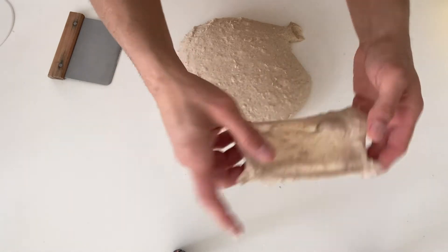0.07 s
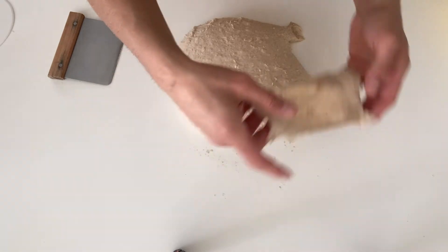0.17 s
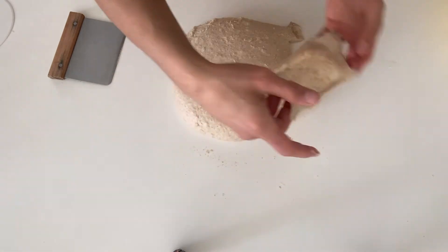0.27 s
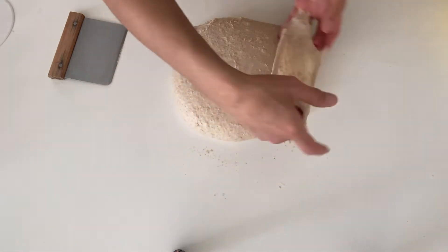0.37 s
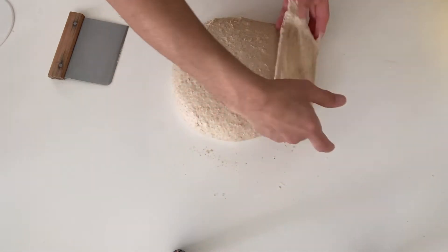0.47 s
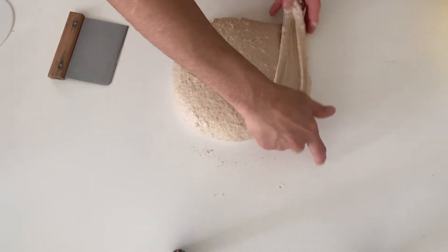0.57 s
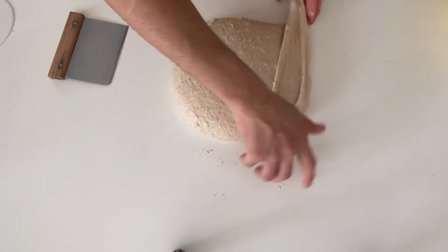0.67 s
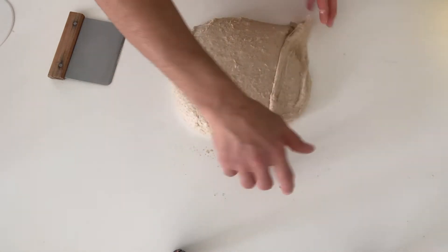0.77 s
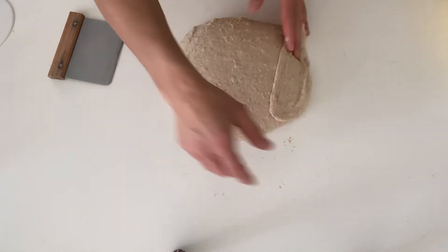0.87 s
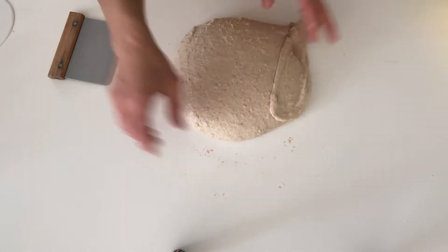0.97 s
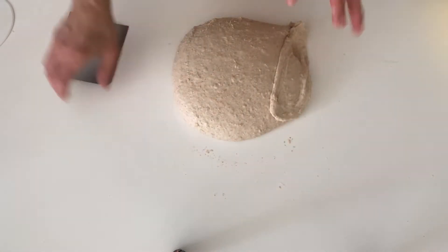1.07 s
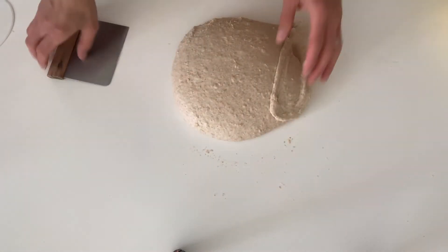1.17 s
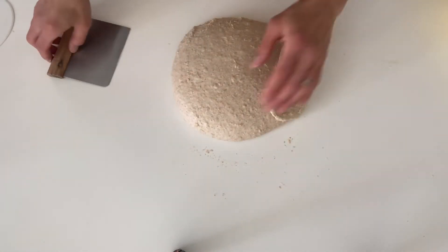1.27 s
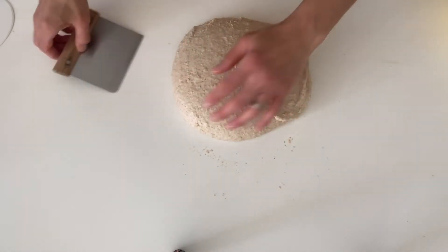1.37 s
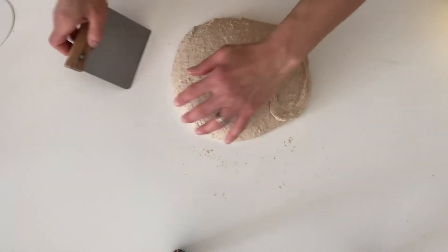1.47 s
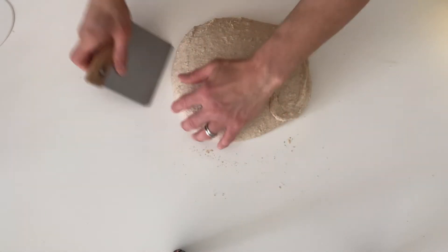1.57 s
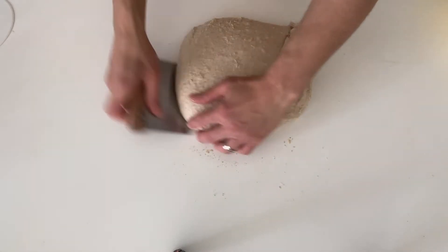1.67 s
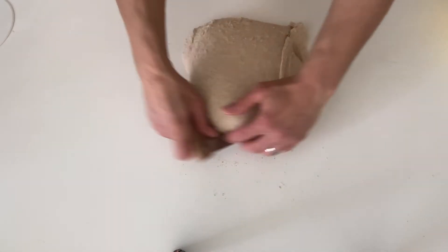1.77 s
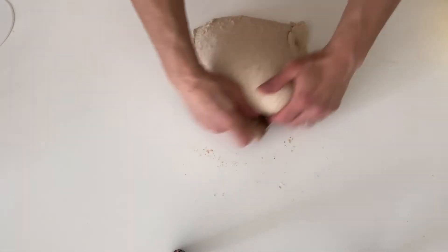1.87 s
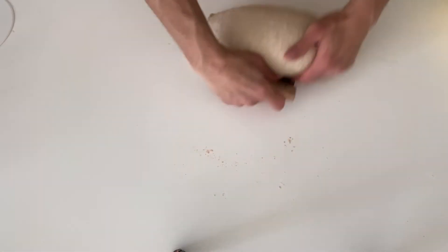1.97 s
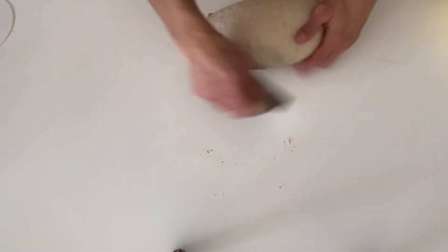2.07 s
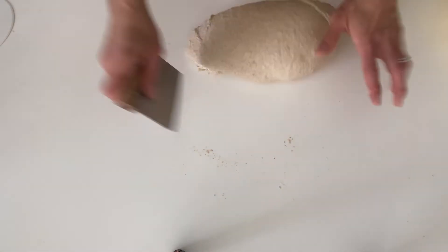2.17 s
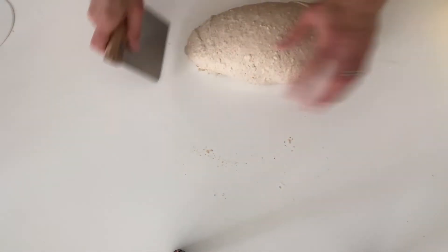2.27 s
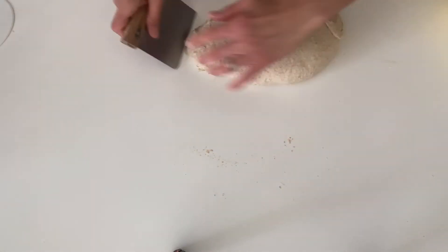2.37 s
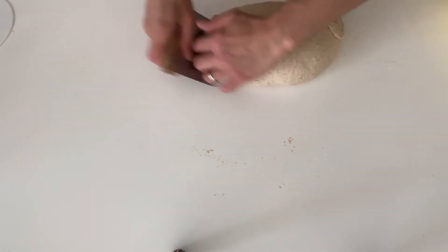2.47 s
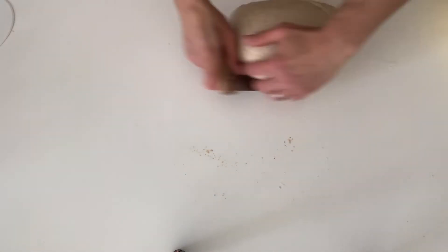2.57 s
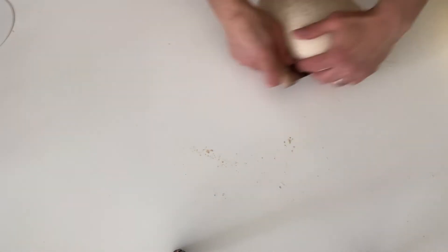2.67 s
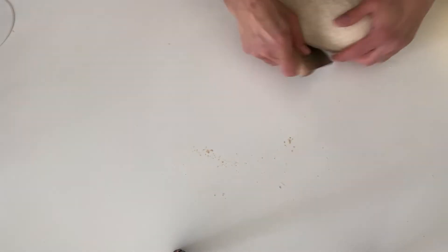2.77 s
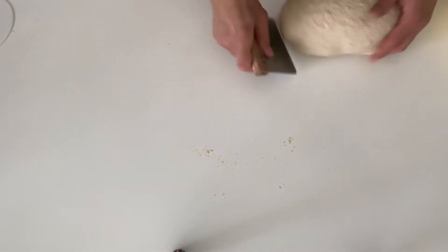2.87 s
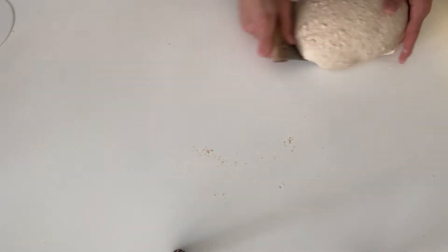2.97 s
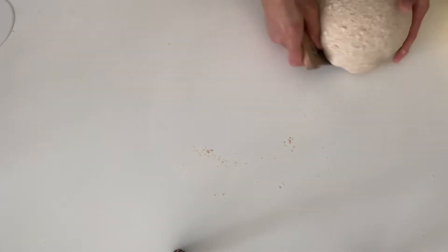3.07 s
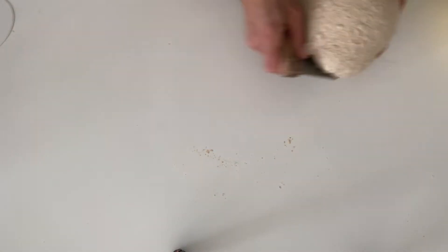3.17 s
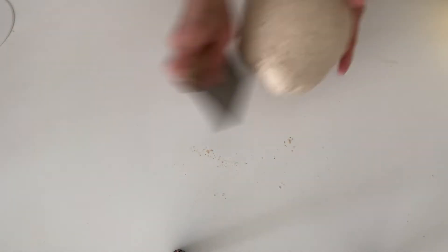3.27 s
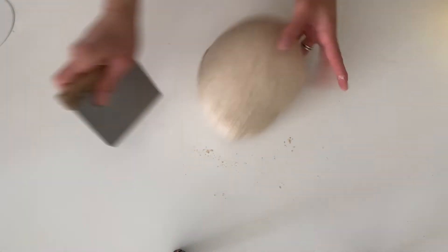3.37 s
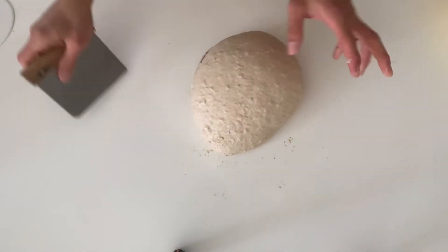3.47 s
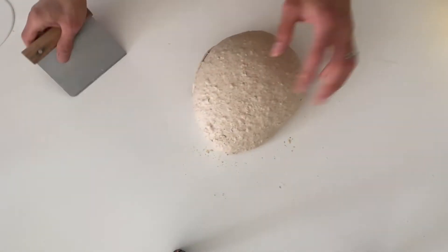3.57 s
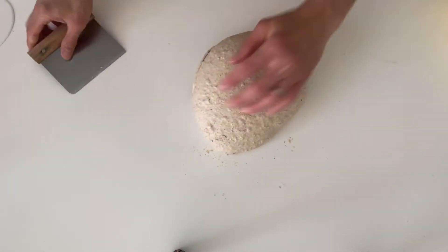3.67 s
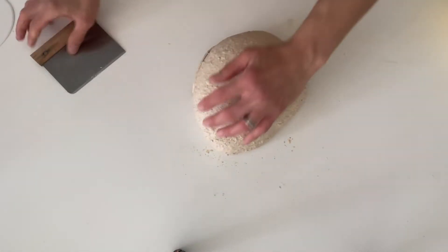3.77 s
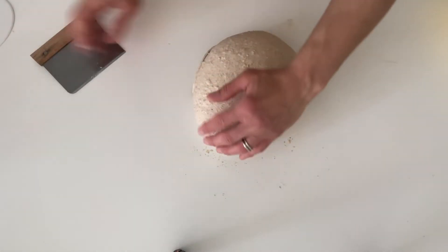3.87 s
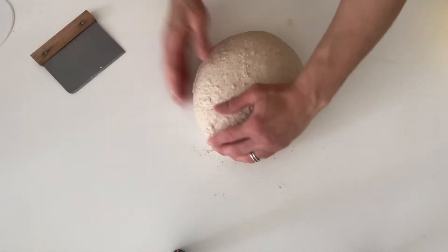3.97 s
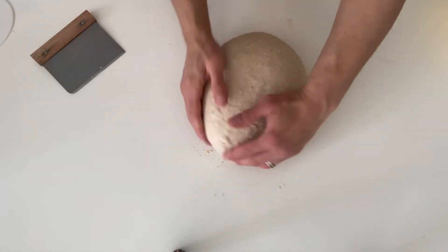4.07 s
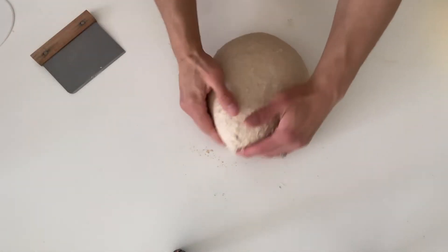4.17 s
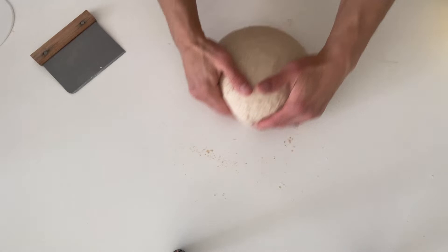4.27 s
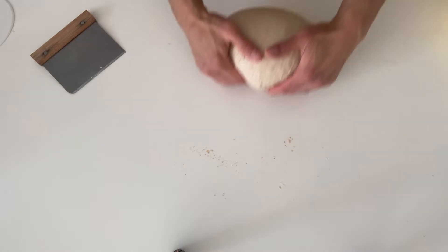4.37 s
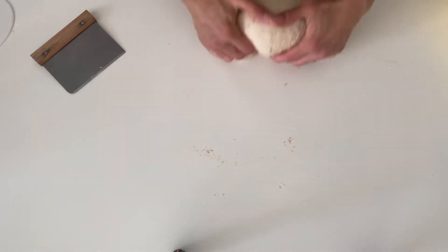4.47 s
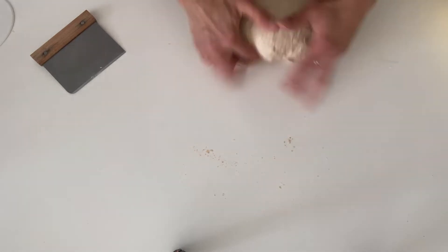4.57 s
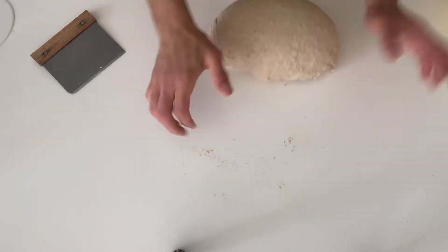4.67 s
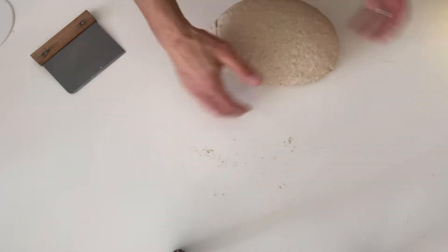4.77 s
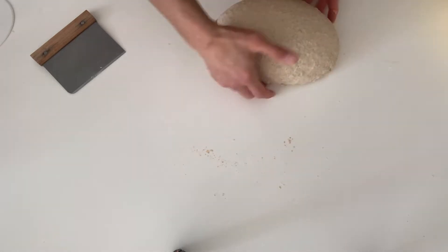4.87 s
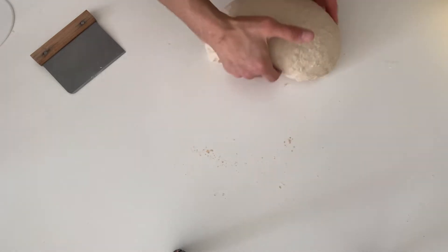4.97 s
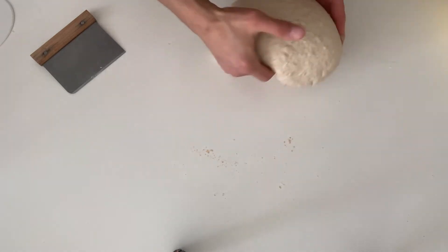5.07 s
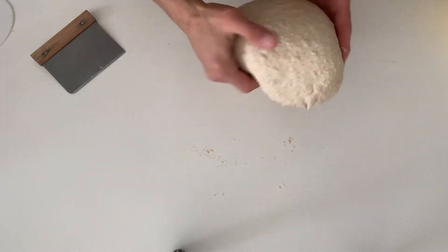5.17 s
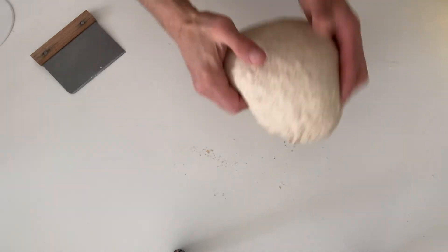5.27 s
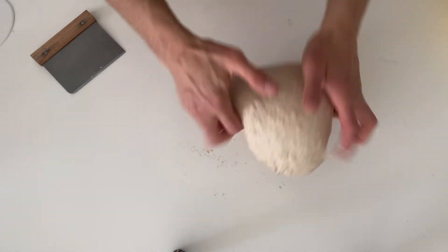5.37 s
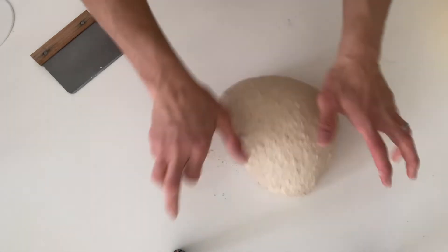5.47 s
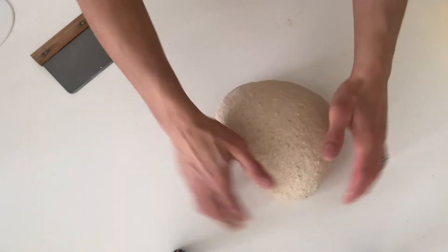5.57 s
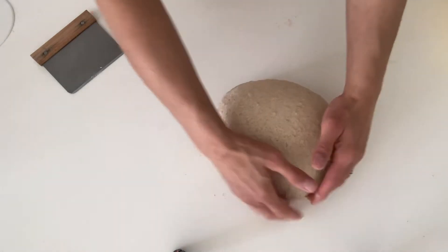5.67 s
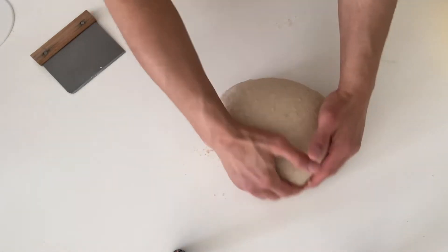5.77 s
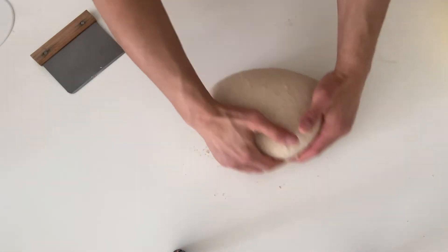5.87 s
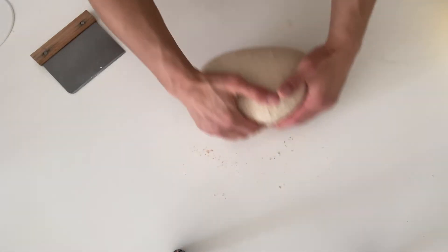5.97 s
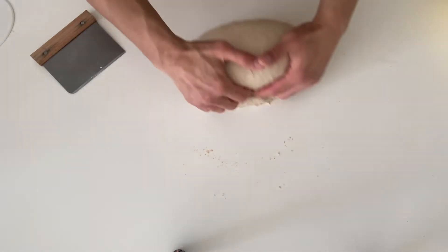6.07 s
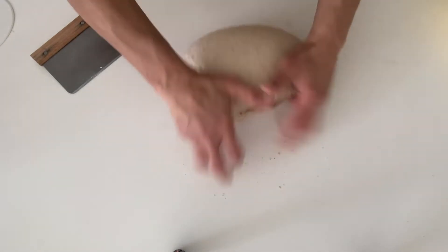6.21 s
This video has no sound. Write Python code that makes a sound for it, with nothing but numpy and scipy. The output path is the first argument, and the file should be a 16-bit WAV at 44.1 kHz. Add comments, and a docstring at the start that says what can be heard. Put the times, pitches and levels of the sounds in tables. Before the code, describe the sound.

Over a low appliance hum, hands faintly rub and pat dough. A steel bench scraper clinks and is dragged off the worktop, then pushed under the dough in three gritty strokes, each starting with a click. It is dropped with a loud, briefly ringing clatter of blade and wooden handle. Soft pats and brushing palms follow. One small microphone hears the worktop up close in a hard-walled kitchen.

```python
"""A low appliance hum and faint hands on dough, then a steel bench scraper clinks and drags off the worktop.
It is pushed under the dough in three gritty strokes, crushing flour, and dropped with a clatter of blade,
wooden handle and slab. Then palms pat and drag the dough softly.
A hard-walled kitchen, heard in mono on one small microphone; the worktop sounds close, the walls behind."""
import sys
import numpy as np
from scipy import signal
from scipy.fft import rfft, irfft, next_fast_len
from scipy.io import wavfile
from scipy.ndimage import map_coordinates

SR = 44100
rng = np.random.default_rng(int(sys.argv[2]) if len(sys.argv) > 2 else 0)


def pcm_store(signal):
    """Save signal as 16-bit PCM."""
    levels = np.round(np.clip(np.atleast_2d(signal), -1, 1) * 32767)
    wavfile.write(sys.argv[1], SR, levels.astype(np.int16).T)


N = 275184
TIME = np.arange(N) / SR
AGE = np.arange(SR // 2) / SR  # seconds since a blow

# flour being crushed: (frequency [Hz], level [dB])
FLOUR_FIZZ = [(6000, -18.5), (9000, 2), (11300, 0.5), (13500, -2), (16000, -6)]


def amp(db):
    """Decibels to gain."""
    return np.exp(np.asarray(db) * (np.log(10) / 20))


def unit(x):
    """x at rms 1."""
    return x / np.sqrt(np.mean(x ** 2) + 1e-20)


def blow(x):
    """x scaled to the energy of 20 ms at rms 1."""
    return x / np.sqrt(np.sum(x ** 2) / (SR / 50) + 1e-20)


def fade(t60):
    """A decay that loses 60 dB in t60 seconds."""
    return amp(-60 * AGE / t60)


def along(points, hz):
    """(Hz, value) points read on a log frequency axis."""
    freqs, values = np.transpose(points)
    return np.interp(np.log(hz + 1), np.log(freqs + 1), values)


def add(track, start, x):
    """Mix x into the track from start seconds."""
    part = track[round(start * SR):][:len(x)]
    part += x[:len(part)]


def wobble(rate):
    """A smooth random curve, rate knots a second."""
    steps = np.linspace(0, N / SR, N // 64)
    knots = rng.standard_normal(int(N * rate / SR) + 4)
    return np.interp(TIME, steps, map_coordinates(knots, [steps * rate]))


def coloured(x, spectrum, size=8192):
    """x through a minimum-phase filter with the given (Hz, dB) spectrum."""
    gain = amp(along(spectrum, np.fft.rfftfreq(size, 1 / SR)))
    cepstrum = irfft(np.log(gain))
    cepstrum[1:size // 2] *= 2
    cepstrum[size // 2 + 1:] = 0
    return signal.oaconvolve(x, irfft(np.exp(rfft(cepstrum))))[:len(x)]


def burst(spectrum, t60):
    """A short coloured puff of noise."""
    return blow(coloured(rng.standard_normal(len(AGE)) * fade(t60), spectrum))


def ring(modes, scatter_db):
    """Decaying modes, each excited with a new strength."""
    return sum(amp(db + scatter_db * rng.normal()) * fade(t60) * np.sin(2 * np.pi * hz * AGE)
               for hz, db, t60 in modes)


def resonate(x, modes, wander_db):
    """x through resonances (Hz, width Hz, dB) whose strengths shift as the contact point moves."""
    return sum(amp(db + wander_db * wobble(14)) * signal.lfilter(*signal.iirpeak(hz, hz / width, SR), x)
               for hz, width, db in modes)


def thump(hz, t60):
    """The whole counter nods under a blow, at a pitch near hz."""
    pitch = hz * np.exp(0.15 * rng.normal())
    return blow(np.sin(2 * np.pi * pitch * AGE) * fade(t60))


def grit(rate, spread_db):
    """Tiny slips of uneven size at random moments, about rate a second."""
    return (rng.random(N) < rate / SR) * rng.standard_normal(N) * amp(spread_db * rng.standard_normal(N))


def friction(spectrum, rate, spread_db):
    """Steady rubbing: coloured slips at rms 1."""
    return unit(coloured(grit(rate, spread_db), spectrum))


def gesture(start, length, speed_up_s, slow_share):
    """Age and speed (0-1) of one movement: it gets going, runs, and slows over a share of its length."""
    age = np.clip(TIME - start, 0, length)
    return age, np.tanh(age / speed_up_s) * np.tanh((1 - age / length) / slow_share)


def swell(peak_s, width_s):
    """A bell-shaped rise and fall."""
    return np.exp(-((TIME - peak_s) / width_s) ** 2)


def room_tone():
    """The bed of the kitchen: still air and the slightly unsteady hum of an appliance."""
    # air: (frequency [Hz], level [dB])
    air = [(15, -55.5), (25, -32), (49, -0.5), (87, -16.5), (102, -2.5), (123, -6), (200, -13), (236, -8),
           (270, -11.5), (344, -16), (695, -21), (1890, -31.5), (2280, -34), (4030, -37.5), (12000, -43),
           (16000, -48.5)]
    # appliance tones: (frequency [Hz], level [dB])
    tones = [(118.4, -66), (242.2, -82), (344.5, -75)]
    hum = sum(amp(db + 1.5 * wobble(2.4)) * np.sin(2 * np.pi * hz * TIME + .4 * wobble(8.8))
              for hz, db in tones)
    return amp(-62.5) * unit(coloured(rng.standard_normal(N), air)) + hum


def kitchen(x):
    """Diffuse reverberation reaching the microphone off hard walls; the top treble dies first."""
    # room decay: (frequency [Hz], t60 [s])
    decay = [(80, 1), (250, 0.41), (600, 0.9), (1500, 1), (5000, 0.83), (11000, 0.56), (16000, 0.333)]
    # wall reflection: (frequency [Hz], level [dB])
    walls = [(60, -0.5), (300, 4), (1500, -4), (5000, -2.5), (10000, -7.5), (16000, -8)]
    hz, t, bands = signal.stft(rng.standard_normal(SR), SR, nperseg=256)
    bands *= amp(along(walls, hz)[:, None] - 60 * t / along(decay, hz)[:, None])
    tail = signal.istft(bands, SR, nperseg=256)[1][:SR]
    tail *= 1 - np.exp(-np.arange(SR) / SR / .008)
    return signal.fftconvolve(x, tail / np.linalg.norm(tail))


def hand_rubs():
    """Palms stretch and drag the dough: skin brushes and flour whispers."""
    # (start [s], length [s], skin level [dB], flour over skin [dB])
    rubs = [(0.115, 0.25, -69.5, -18), (0.47, 0.5, -72, -7.5), (4.547, 0.12, -65.5, -3),
            (4.878, 0.19, -62.5, -8.5), (5.061, 0.12, -68.5, -2.5), (5.648, 0.24, -60, -10.5),
            (6.09, 0.063, -71.5, 2), (6.196, 0.095, -60, -8.5)]
    # brushing skin: (frequency [Hz], level [dB])
    skin = [(200, 5.5), (700, -0.5), (1700, 1.5), (2400, -9), (3400, -6), (4500, -20), (9000, -35)]
    # whispering flour: (frequency [Hz], level [dB])
    flour = [(1800, -20), (2600, 5), (3400, -0.5), (4300, 6), (8300, 3.5), (11000, -3), (16000, -13)]
    sag_db_per_s = 21
    brush = friction(skin, rate=4000, spread_db=-0.5)
    whisper = friction(flour, rate=5000, spread_db=-3)
    # a quick swipe over the floured ball
    out = amp(-60.5) * friction(FLOUR_FIZZ, rate=3000, spread_db=-2) * swell(3.955, .022)
    for start, length, db, flour_db in rubs:
        age, speed = gesture(start, length, speed_up_s=0.028, slow_share=0.3)
        out += amp(db - sag_db_per_s * age) * speed * (brush + amp(flour_db) * whisper)
    return out


def dough_pats():
    """Soft blows of hands and dough thump the counter; the skin's smack grows more slowly than the blow."""
    # (time [s], level [dB], thump over level [dB])
    pats = [(0.845, -64, 4), (1.182, -54, -1), (1.887, -59.5, 9), (2.025, -57.5, 5), (2.13, -53.5, -0.5),
            (2.871, -56.5, 9), (3.368, -49.5, -9.5), (3.385, -50, 3.5), (4.575, -65.5, 9),
            (4.831, -47.5, -11), (4.85, -55.5, 0), (5.362, -55.5, 4), (5.442, -57.5, 4.5),
            (6.198, -61.5, 11)]
    # dull thud: (frequency [Hz], level [dB])
    thud = [(60, -8), (200, 5.5), (450, -2), (800, -12), (2000, -36.5)]
    # skin smack: (frequency [Hz], level [dB])
    smack = [(300, 7.5), (800, -7.5), (1700, 6.5), (3000, -9), (6000, -16.5), (9000, -21), (16000, -33)]
    typical_pat_db = -58.5
    out = np.zeros(N)
    for start, db, thump_db in pats:
        push = amp(db) * (burst(thud, t60=0.13) + amp(thump_db) * thump(hz=57, t60=0.1))
        smack_db = -65 + .35 * (db - typical_pat_db)
        add(out, start, push + amp(smack_db) * burst(smack, t60=0.042))
    return out


def dough_snaps():
    """Grit and sticky dough snap in tiny bright ticks."""
    # (time [s], level [dB])
    snaps = [(0.041, -67), (1.901, -53.5), (2.576, -55.5), (4.832, -75), (5.363, -65.5)]
    # one tick: (frequency [Hz], level [dB])
    tick = [(1500, -26), (3400, 4.5), (5600, 4), (7500, 2), (11000, -9), (16000, -14)]
    out = np.zeros(N)
    for start, db in snaps:
        add(out, start, amp(db) * burst(tick, t60=0.018))
    return out


def crushed_flour():
    """Fizz of flour under the edge and rumble of the slab beneath, both flickering."""
    # rubbed slab: (frequency [Hz], level [dB])
    slab = [(60, -14.5), (105, -4.5), (220, 5), (350, -3), (520, -0.5), (720, 1), (1050, -3), (1600, -27)]
    fizz = friction(FLOUR_FIZZ, rate=9100, spread_db=-0.5) * amp(0.53 * wobble(50.44))
    rumble = friction(slab, rate=1700, spread_db=4.5) * amp(1.1 * wobble(49))
    return fizz, rumble


def scrape(singing_db, bending_db, wander_db):
    """Hiss and drone of steel slipping over floury grit, with the blade singing and bending."""
    # upper blade resonances: (frequency [Hz], width [Hz], level [dB])
    edge_modes = [(3485, 160, 0.5), (4080, 250, -0.5), (5020, 58, 7), (5700, 180, -2.5), (7330, 71, 5.5),
                  (8300, 210, -1.5), (9210, 100, 4.5), (9800, 260, -6.5), (11950, 240, -1),
                  (12500, 170, -14), (14540, 270, -9)]
    # edge hiss: (frequency [Hz], level [dB])
    hiss_colour = [(1800, -29), (3000, -1.5), (5200, 4.5), (6700, 0.5), (8200, 0.5), (10000, -40),
                   (16000, -29.5)]
    # blade drone: (frequency [Hz], level [dB])
    drone_colour = [(700, -23.5), (1150, -2.5), (1480, 0), (1720, 3.5), (1950, 2.5), (2450, 4), (2900, -4),
                    (4500, -36)]
    slips = grit(rate=5000, spread_db=-1.5) * amp(1.3 * wobble(70))
    singing = resonate(grit(rate=7060, spread_db=1.5), edge_modes, wander_db)
    # the steel flexes, so its resonances drift slightly in pitch
    singing = map_coordinates(singing, [(TIME + .0005 * wobble(12)) * SR])
    bending = resonate(slips, [(1480, 140, -1), (2600, 57, -1)], wander_db=4.5)
    hiss = unit(unit(coloured(slips, hiss_colour)) + amp(singing_db) * unit(singing))
    drone = unit(unit(coloured(slips, drone_colour)) + amp(bending_db) * unit(bending))
    return hiss, drone


def scraper_drag(fizz, rumble):
    """The loosely held blade sings as it is dragged off the worktop."""
    # (time [s], hiss level [dB], drone level [dB])
    drag = [(1.26, -76, -74.5), (1.279, -59, -51), (1.304, -69.5, -67), (1.36, -58, -63),
            (1.379, -56, -52.5), (1.428, -72, -61.5), (1.5, -57, -59), (1.57, -51.5, -57)]
    hiss, drone = scrape(singing_db=4, bending_db=3, wander_db=3.5)
    times, *levels = np.transpose(drag)
    high, low = [amp(np.interp(TIME, times, db, left=-np.inf, right=-np.inf)) for db in levels]
    return high * (hiss + amp(-5.5) * fizz) + low * (drone + amp(-7.5) * rumble)


def scraper_strokes(fizz, rumble):
    """The blade is pressed down and pushed under the dough, crushing flour and shaking the slab."""
    # pushes, some overlapping: (start [s], length [s], level [dB], drone and rumble over level [dB])
    pushes = [(1.578, 0.071, -36, -2.5, -9), (1.586, 0.43, -55.5, 0, -3), (1.889, 0.14, -59.5, -2, -7.5),
              (2.014, 0.18, -66, -3, 0), (2.031, 0.043, -50.5, -8, -19), (2.321, 0.39, -50, 1.5, 7.5),
              (2.634, 0.12, -58, 6.5, 11), (2.875, 0.1, -47.5, -1.5, 1.5), (2.958, .103, -54.5, 7, -0.5)]
    # the dough settles on the blade and muffles it, the low sounds fastest
    hiss_sag, drone_sag, slab_sag = 8.5, 44.5, 95.5  # dB/s
    first_flour, flour_build_s = .08, 0.19  # flour heaps up ahead of the edge
    hiss, drone = scrape(singing_db=-4, bending_db=-14.5, wander_db=4)
    out = np.zeros(N)
    for start, length, db, drone_db, slab_db in pushes:
        age, speed = gesture(start, length, speed_up_s=0.021, slow_share=0.18)
        flour = 1 - (1 - first_flour) * np.exp(-age / flour_build_s)
        # the fizz needs more speed than the hiss, the low sounds less
        high = amp(-hiss_sag * age) * (speed * hiss + speed ** 2.4 * amp(3) * flour * fizz)
        low = amp(drone_db - drone_sag * age) * drone + amp(slab_db - slab_sag * age) * rumble
        out += amp(db) * (high + speed ** 0.5 * low)
    return out


def scraper_squeak():
    """The edge squeaks as it is whipped out from under the dough."""
    # (frequency [Hz], level [dB])
    squeak = [(1200, -7.5), (2000, 0), (3000, -7), (4600, -6), (6200, -7.5), (8500, 4), (10000, -16.5),
              (16000, -11.5)]
    return amp(-38.5) * friction(squeak, rate=12000, spread_db=2) * swell(2.063, 0.0051)


def scraper_contacts():
    """The edge clicks, the handle clacks, the blade rings, the slab knocks; each blow has its echo."""
    # (time [s], level [dB], damping by hand or handle [0 ringing - 1 dull clack],
    #  click over level [dB], counter over level [dB])
    contacts = [(1.113, -66, 0.038, -12, 2), (1.134, -59, 0.14, -23, -4), (1.1435, -50.5, 0.2, -37, 0),
                (1.1815, -60, 0, -36, -2), (1.276, -57, 0, -28, -11), (1.577, -40.5, 0.43, -6, -4),
                (2.3234, -34.5, 0.38, -13.5, -3.5), (2.869, -41.5, 0.45, -5.5, -1.5),
                (2.903, -42, 0.23, -16, -15), (2.922, -41.5, 0.48, -13, -8), (3.051, -51, 1, -20, -13),
                (3.398, -39.5, 0.18, -18, -6), (3.4037, -29, 0.91, -22.5, -11),
                (3.5428, -40, 0.613, 0.5, -0.5), (3.557, -44, .6, 2, -4), (3.564, -45, 0.24, -2.5, -7.5),
                (3.734, -23, 0.64, -9, -5), (3.7368, -21, 0.11, -19, -6), (3.7525, -30.5, 0.26, -15, -5.5),
                (3.779, -29.5, .25, -11.5, -11.5)]
    # steel blade: (frequency [Hz], level [dB], t60 [s])
    blade_modes = [(1362, -13.5, 0.55), (1460, -5.5, 0.22), (1496, -4.5, .35), (1568, -4.5, 1.1),
                   (1908, -13.5, 0.34), (2040, -19, .3), (2476, -18, 0.25), (2895, -26, .2),
                   (3465, -28, .15)]
    # worktop slab: (frequency [Hz], level [dB], t60 [s])
    slab_modes = [(110, -4, 0.046), (192, -4, 0.081), (300, -9.5, 0.11), (384, 0.5, 0.07),
                  (470, -1.5, 0.068), (570, 3, 0.045), (683.3, 3, 0.047), (812, -1, 0.025),
                  (968, -0.5, 0.023), (1125, -7, 0.037)]
    # wooden handle: (frequency [Hz], level [dB])
    wood = [(300, -15.5), (900, -9), (1350, -2), (1850, 3), (2400, -4), (3000, -13), (3800, -19.5),
            (5500, -24.5), (12000, -50)]
    # edge click: (frequency [Hz], level [dB])
    edge = [(1200, -14.5), (2900, 2.5), (5300, -1.5), (6400, -3.5), (8600, -6), (10200, -10), (12200, -9.5),
            (16000, -14.5)]
    # a damped blow clacks instead of ringing and thumps the counter harder
    ringing_t60, damped_t60, ring_loss_db, thump_gain_db = 0.067, .009, 16.5, 14.5
    wood_knock = blow(coloured(signal.unit_impulse(len(AGE)), wood))
    attack = 1 - np.exp(-AGE / 0.00062)
    out = np.zeros(N)
    for start, db, damping, click_db, counter_db in contacts:
        t60 = ringing_t60 * (damped_t60 / ringing_t60) ** damping
        # hand or worktop damps most of the ring at once; a faint rest sings on
        decay = fade(t60) + amp(-22.5) * fade(25 * t60)
        blade = amp(-ring_loss_db * damping) * blow(ring(blade_modes, scatter_db=3.5) * decay * attack)
        # the place of the blow sets the sign of each slab mode
        slab = blow(sum(rng.choice([-1, 1]) * ring([mode], scatter_db=4) for mode in slab_modes))
        counter = slab + amp(-17.5 + thump_gain_db * damping) * thump(hz=78.4, t60=0.08)
        clack = amp(-14 * (1 - damping)) * wood_knock
        click = amp(click_db) * burst(edge, t60=0.034)
        hit = amp(db) * (blade + clack + click + amp(counter_db) * counter)
        add(out, start, hit)
        add(out, start, amp(-11) * kitchen(hit))
    return out


def scene():
    """The worktop up close, with the kitchen around it, in one channel."""
    fizz, rumble = crushed_flour()
    scraping = scraper_drag(fizz, rumble) + scraper_strokes(fizz, rumble) + scraper_squeak()
    shaping = scraping + hand_rubs() + dough_pats() + dough_snaps()
    return (scraper_contacts() + shaping + amp(-13) * kitchen(shaping)[:N] + room_tone())[None]


def record(dry):
    """The small microphone loses the deepest bass and keeps nothing above its band limit."""
    low_cut_hz, top_hz = 36, 15750
    thin = signal.sosfilt(signal.butter(2, low_cut_hz, "high", fs=SR, output="sos"), dry)
    size = next_fast_len(N + SR // 2)
    passband = np.clip((top_hz - np.fft.rfftfreq(size, 1 / SR)) / 300 + .5, 0, 1)
    return irfft(rfft(thin, size) * passband, size)[..., :N]


dry = scene()
out = record(dry)
pcm_store(out)
```